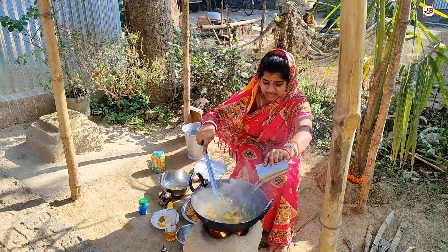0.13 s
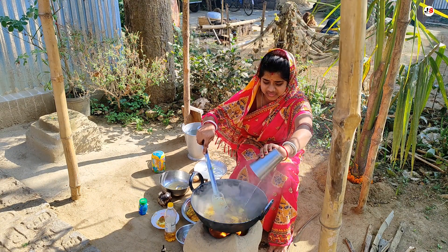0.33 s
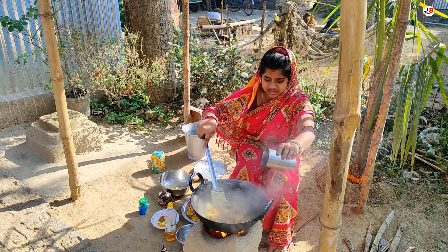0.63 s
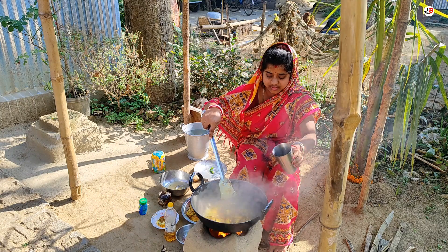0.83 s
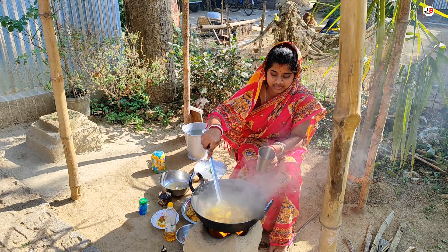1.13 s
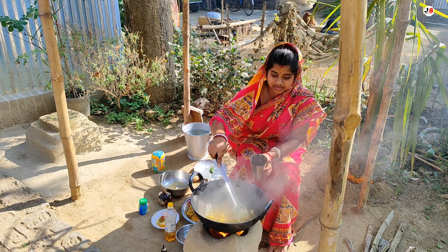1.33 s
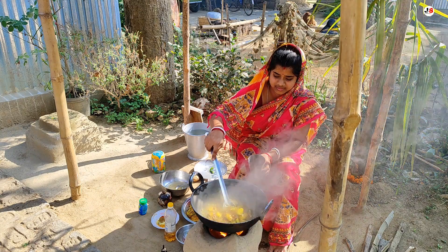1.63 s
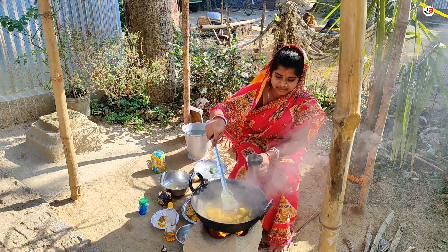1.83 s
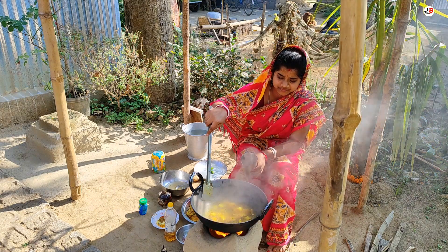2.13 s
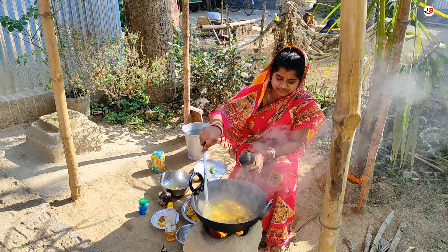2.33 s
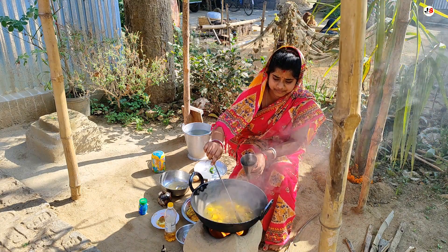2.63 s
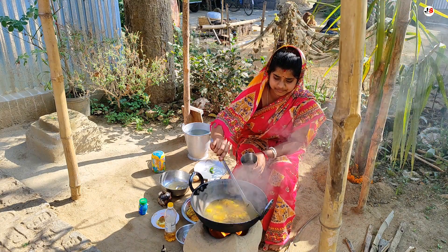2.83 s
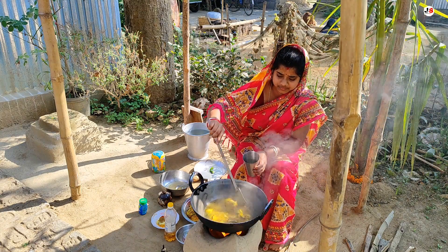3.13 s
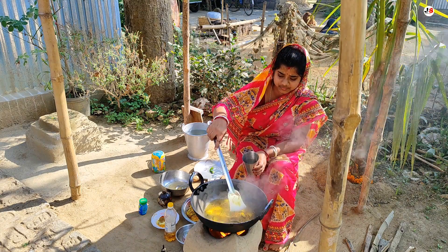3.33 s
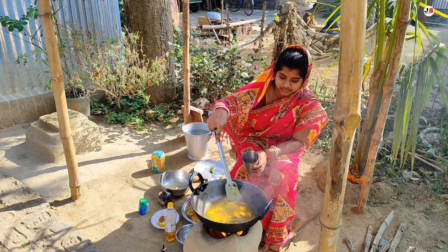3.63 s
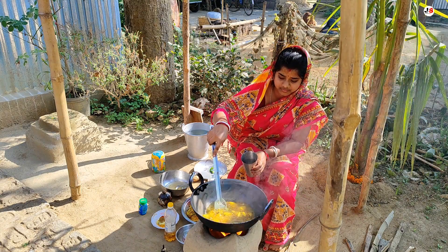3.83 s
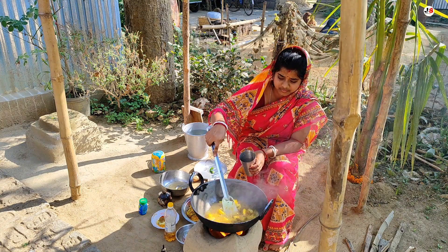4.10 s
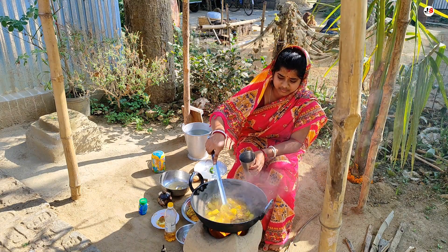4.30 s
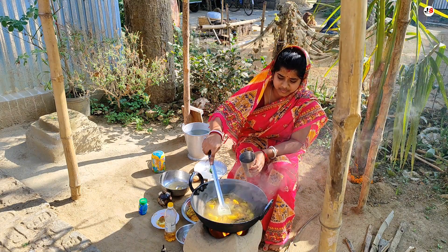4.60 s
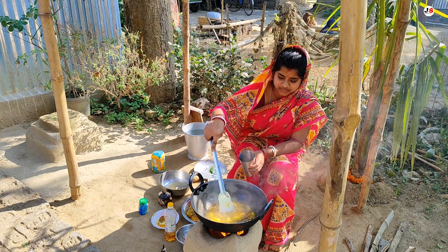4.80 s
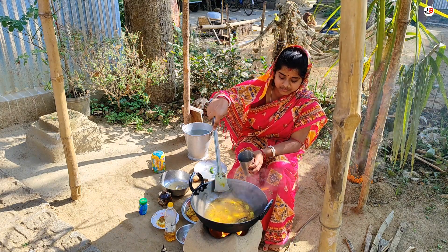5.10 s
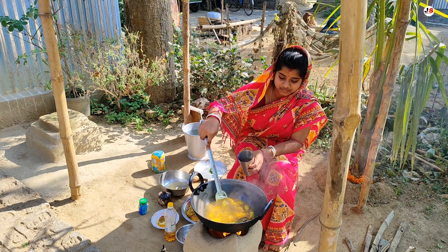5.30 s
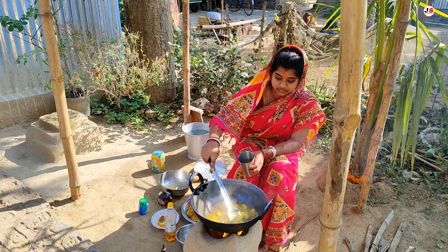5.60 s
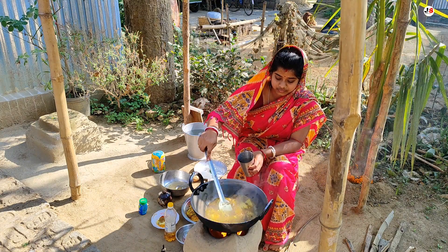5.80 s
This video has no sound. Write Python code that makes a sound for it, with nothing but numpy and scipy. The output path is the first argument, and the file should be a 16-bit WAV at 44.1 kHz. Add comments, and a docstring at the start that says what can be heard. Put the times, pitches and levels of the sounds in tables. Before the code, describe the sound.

The sound opens in full boil: water in a hot iron pan gives a loud, broad, grainy hiss with thick splutter, low gurgle and a hollow pan resonance. It stays strong with small surges until about 1.8 s, then sinks steadily to a thin simmer by 3.6 s. Sizzling flares jump up quickly and fade within fractions of a second near 2.2, 2.6, 3.7, 4.0, 4.2, 4.6, 5.3, 5.6 and 5.85 s, their splutter pitch sagging. Dull, short spatula knocks fall at 1.2 and 2.6 s, with weaker ones at 3.6, 3.8 and 4.0 s. Drops spit sharply at 0.9 and 1.4 s and more often after 4 s, strongest at 4.87 s. Soft low plops come near 5.45 and 5.55 s. A faint distant engine climbs in pitch, swelling around 4.65 s, over low yard and fire rumble. Close, dry outdoor stereo, with wide bright treble.

```python
"""Potatoes frying in a hot iron pan, outdoors

Poured water boils off in a loud hiss that dies down, then flares up each time wet food is turned onto bare iron:
random bursts over steady noise, banded by bubble size. Drops spit (clicks and puffs of noise), the spatula taps
(dying sines), sauce plops (short tones), an engine drones far off (two sines), and the yard and the fire rumble
(low noise). Two microphone ports close to each other colour the treble differently."""
import sys
import numpy as np
from scipy import signal
from scipy.fft import rfft, irfft, next_fast_len
from scipy.io import wavfile
from scipy.ndimage import uniform_filter1d

SR = 44100
rng = np.random.default_rng(int(sys.argv[2]) if len(sys.argv) > 2 else 0)


def int16_out(signal):
    """Quantize to a 16-bit WAV file."""
    q = np.round(np.clip(np.atleast_2d(signal).T, -1, 1) * 32767)
    wavfile.write(sys.argv[1], SR, q.astype(np.int16))


N = 262395

# drops that burst: (time [s], snap level [dB], spray level [dB], spray length [s], drop in boil gain just after [0-1])
SPIT_DROPS = [(0.9395, -33, -23, 0.0011, 0), (1.374, -24, -40, 0.0009, 0.03), (3.477, -40, -52, 0.0011, 0),
              (4.0285, -26, -42, .001, 0), (4.0472, -46, -30, 0.0008, 0.5), (4.0587, -26, -35, 0.00091, 0),
              (4.715, -46, -35, 0.0009, 0), (4.8679, -19.5, -29, 0.0019, 0.9),
              (4.9816, -25, -33, 0.00074, 0), (5.085, -43, -60.5, 0.00094, 0.04),
              (5.2215, -31, -43, 0.0012, 0.05), (5.4625, -46, -39, 0.0012, 0.4),
              (5.48, -41, -50, 0.0012, 0.1), (5.6894, -33, -39, 0.0012, 0.15)]


def amp(db):
    """Decibels to gain."""
    return 10 ** (np.asarray(db) / 20)


def evened(x):
    """Scales to rms 1."""
    return x / np.sqrt(np.mean(x ** 2) + 1e-20)


def summed(*levels_db):
    """Adds levels as powers."""
    return 10 * np.log10(sum(amp(db) ** 2 for db in levels_db))


def read(points, hz):
    """Reads a spectrum table on a log-frequency axis."""
    f, value = np.transpose(points)
    return np.interp(np.log(hz + 1), np.log(f + 1), value)


def colour(x, gain):
    """Filters by a gain given as a function of frequency."""
    size = next_fast_len(N + 4096)
    freqs = np.fft.rfftfreq(size, 1 / SR)
    return irfft(rfft(x, size) * gain(freqs), size)[..., :N]


def band(x, lo, hi):
    """A band with soft shoulders."""
    return colour(x, lambda f: 1 / np.sqrt((1 + (lo / (f + 1)) ** 16) * (1 + (f / hi) ** 16)))


def resonate(x, hz, width_hz):
    """A resonance that follows a moving pitch: shifted down to 0 Hz, smoothed, and shifted back."""
    turn = np.exp(2j * np.pi * np.cumsum(hz) / SR)
    r = np.exp(-np.pi * width_hz / SR)
    return 2 * (turn * signal.lfilter([1 - r], [1, -r], x / turn)).real


def wander(seconds, count=1):
    """Random drift of rms 1 that changes over the given time."""
    size = max(round(seconds * SR), 1)
    noise = rng.standard_normal((count, N))
    return evened(uniform_filter1d(uniform_filter1d(noise, size), size))


def pair(a, b):
    """Two ports close together hear nearly the same bass but unrelated treble."""
    # left-right likeness: (frequency [Hz], likeness [0-1])
    likeness = [(30, .95), (60, .97), (140, .89), (260, .99), (500, .98), (860, .95), (1200, .98),
                (1700, .85), (2800, .82), (3600, .55), (5300, .22), (7500, 0)]
    same = lambda f: np.clip(read(likeness, f), 0, 1)
    near = colour(a, lambda f: np.sqrt((1 + same(f)) / 2))
    apart = colour(b, lambda f: np.sqrt((1 - same(f)) / 2))
    return np.array([near + apart, near - apart])


def bubbles(crowd, spread_db, per_s=12000, hiss=1.0, clump_db=-0.2):
    """Thousands of tiny bursts, a few of them large, over smooth steam; they come in clumps."""
    size = amp(spread_db * np.minimum(rng.exponential(1, N), 4.5))
    size = size * (rng.random(N) < per_s / SR)
    pops = evened(size) * rng.standard_normal((2, N))
    steam = hiss * rng.standard_normal((2, N))
    clumps = amp(clump_db * wander(0.049))
    return pair(*(crowd * clumps * (pops + steam)))


def flare(t, rise, hold, fade_db_per_s):
    """Linear rise from -60 dB, then a hold and a steady fade, in dB below the peak."""
    up = np.clip(t / rise, 1e-3, 1)
    return 20 * np.log10(up) - fade_db_per_s * np.maximum(t - rise - hold, 0)


def heat():
    """The dying boil plus the flares sets the level of each bubble size and the splutter pitch."""
    # poured water boiling away, control levels:
    # (time [s], steam [dB], splutter [dB], gurgle [dB], pan ring [dB])
    boiling_off = [(0, -21, -32, -41, -39), (.2, -22, -33, -40.5, -42), (.55, -25.5, -30.5, -40.5, -38),
                   (0.849, -27.5, -31.5, -40, -39), (1.05, -26.5, -31.5, -39.5, -37.5),
                   (1.22, -25.5, -28.5, -39.5, -35), (1.331, -27.5, -31, -36, -33),
                   (1.5, -25.5, -31.5, -39, -35.5), (1.651, -27.5, -31, -37.5, -37.5),
                   (1.8, -24.5, -32.5, -40.5, -37), (2, -29.5, -36.5, -43.5, -43.5),
                   (2.2, -30, -37, -43, -40.5), (2.549, -34, -37, -43.5, -43), (2.9, -35.5, -41, -46, -45),
                   (3.05, -34.5, -38.5, -47.5, -45), (3.25, -38.5, -45, -48, -47),
                   (3.401, -37.5, -41, -47.5, -48), (3.6, -42, -46.5, -51, -49.5)]
    # how the boil sinks after that: steam, splutter, gurgle, ring [dB/s]
    simmer_db_per_s = [-3, -5.5, -3.5, -5]
    # wet food turned onto bare iron: (start [s], rise [s], hold [s], fade [dB/s], steam [dB], sizzle [dB],
    # lag of the larger bubbles [s], splutter [dB], gurgle [dB], ring [dB], splutter pitch [Hz])
    turned_food = [(2.23, 0.054, 0.038, 90, -33, -44, 0.013, -33.5, -62, -56, 2750),
                   (2.574, 0.07, 0.11, 68, -36, -41.5, .0, -40.5, -69, -43, 2315),
                   (3.668, 0.051, 0.17, 75, -29, -40, 0.021, -39, -55, -48.5, 2180),
                   (3.743, 0.044, .03, 88, -54, -38.5, 0.00059, -35, -57, -45, 2022),
                   (3.995, 0.16, 0.055, 77, -36, -39.5, 0.024, -36.5, -44, -45.5, 2250),
                   (4.225, 0.071, 0.25, 55, -36, -42, 0.099, -39.5, -52, -50.5, 2580),
                   (4.635, 0.051, 0.045, 50, -32, -40.5, 0.012, -39, -53.5, -50, 2200),
                   (5.271, 0.017, 0.032, 131, -33.5, -41, 0.033, -35, -57, -55, 2866),
                   (5.298, 0.025, 0.028, 90, -55, -62, 0.044, -44, -58, -63, 2600),
                   (5.358, .04, 0.021, 35, -42.5, -56, 0.028, -45, -52, -56, 1900),
                   (5.599, 0.12, 0.11, 82.5, -36.5, -41.5, 0.03, -37, -49, -43, 2430),
                   (5.852, 0.033, .08, 56, -36, -42, 0.01, -42, -53, -69, 2590)]
    # own surges of gurgle, splutter, sizzle, fizz, hiss, ring: (depth [dB rms])
    surge_db = [0.25, 0.88, 0.14, 0.9, 0.12, 0.11]
    from_steam = 0.74  # share of the sizzle that follows the steam; the rest follows the splutter
    fizz_from_steam = 0.21  # the rest follows the sizzle
    boil_splutter_hz, sink_hz_per_s, lowest_hz = 2220, 760, 1600
    linger = 0.88  # larger bubbles fade at this share of the steam's speed

    t = np.arange(N) / SR
    s, *columns = np.transpose(boiling_off)
    steam, *large = (np.interp(t, s, c) + sink * np.maximum(t - s[-1], 0)
                     for c, sink in zip(columns, simmer_db_per_s))
    sizzle = -5 + from_steam * steam + (1 - from_steam) * large[0]
    sizzle = summed(sizzle, -61)  # the oil keeps up a thin sizzle between flares
    pitch = amp(large[0]) ** 2 * boil_splutter_hz  # pitches are averaged by splutter power
    for start, rise, hold, fade, steam_db, sizzle_db, lag, *large_db, hz in turned_food:
        early = flare(t - start, rise, hold, fade)
        late = flare(t - start, rise + lag, max(hold - 2 * lag, 0), linger * fade)
        steam = summed(steam, steam_db + early)
        sizzle = summed(sizzle, sizzle_db + from_steam * early + (1 - from_steam) * late)
        large = [summed(old, db + late) for old, db in zip(large, large_db)]
        # the pitch sinks as the bubbles grow
        sunk_hz = np.maximum(hz - sink_hz_per_s * np.maximum(t - start - rise, 0), lowest_hz)
        pitch = pitch + amp(large_db[0] + late) ** 2 * sunk_hz
    splutter, gurgle, ring = large
    fizz = -3.5 + fizz_from_steam * steam + (1 - fizz_from_steam) * sizzle
    levels = [gurgle, splutter - 2.5, sizzle - 4.4, fizz - 2.6, steam - 11, ring]
    surges = np.c_[surge_db] * wander(0.059, count=6)
    return levels + surges, pitch / amp(splutter) ** 2


def mottled(x, patchy_db=1.63, blotchy_db=0.87, streaky_db=3.0, bass_share=0.73, full_hz=2500, trim_db=-0.71):
    """Random gains over time and frequency make the noise uneven: patches, thin streaks, wide blotches."""
    hz, _, z = signal.stft(x, SR, nperseg=1024)
    patches, streaks, blotches = rng.standard_normal((3, *z.shape[1:]))

    def smeared(cells, bins, frames):
        cells = uniform_filter1d(cells, size=bins, axis=0)
        return evened(uniform_filter1d(cells, size=frames, axis=1))

    field_db = patchy_db * smeared(patches, 4, 2)
    field_db = field_db + streaky_db * smeared(streaks, 2, 6)  # thin in frequency, longer in time
    field_db = field_db + blotchy_db * smeared(blotches, 16, 3)  # wide in frequency
    top_db = 4.5  # peaks are held back, holes go deep
    field_db = np.where(field_db > 0, top_db * np.tanh(field_db / top_db), 1.84 * field_db)
    depth = np.clip(hz / full_hz, bass_share, 1)[:, None]  # fainter in the bass
    gain = amp(depth * field_db + trim_db)
    return signal.istft(z * gain, nperseg=1024)[1][:, :N]


def boil():
    """Each bubble size is burst noise in its own band and follows its own heat; the bowl of the pan rings along."""
    # bands of gurgle, splutter, sizzle, fizz, hiss: (low edge [Hz], high edge [Hz])
    size_bands = [(275, 1050), (1400, 3400), (3400, 5000), (5000, 7800), (7800, 16000)]
    # spread of burst sizes in gurgle, splutter, sizzle, fizz, hiss, ring: (spread [dB])
    spiky_db = [0.78, 2.7, 0.84, 0.9, 1.5, 1.8]
    # colour of the pan and the ground around it: (frequency [Hz], gain [dB])
    pan_colour = [(250, -3.5), (400, 3.5), (540, 4), (640, 3), (760, 6), (880, 2), (1020, 2), (1480, -4),
                  (1700, -1.5), (1950, -4.5), (2300, -2.5), (2600, -5), (2950, -2), (3300, -7.5),
                  (3700, -13.5)]
    # moving pitch of the gurgle: (time [s], pitch [Hz])
    gurgle_pitch = [(0, 880), (1.1, 790), (2, 559), (3.2, 524), (4.5, 640), (5.95, 394)]
    ring_hz, ring_width_hz = 1228, 196  # the air in the bowl of the pan

    levels_db, splutter_hz = heat()
    # surges that all sizes share
    crowd = amp(0.33 * wander(0.0015) + 0.54 * wander(0.017) + 0.44 * wander(0.13))
    parts = []
    for (lo, hi), spread_db in zip(size_bands, spiky_db):
        coloured = colour(bubbles(crowd, spread_db), lambda f: amp(read(pan_colour, f)))
        parts.append(band(coloured, lo, hi))
    parts[1] = parts[1] + 1.9 * resonate(parts[1], splutter_hz, 1140)  # most splutter bubbles are near one size
    gurgle_hz = np.interp(np.arange(N) / SR, *np.transpose(gurgle_pitch))
    parts[0] = parts[0] + 0.45 * resonate(parts[0], gurgle_hz, 410)
    bowl = lambda f: 1 / (1 + (2 * (f - ring_hz) / ring_width_hz) ** 2)
    parts.append(colour(bubbles(crowd, spiky_db[-1]), bowl))

    # wide-band pops that follow splutter and sizzle
    crackle = band(bubbles(crowd, 1.2, per_s=1600, hiss=0, clump_db=1.0), 1300, 8100)
    crackle = colour(crackle, lambda f: amp(read([(2500, 6.5), (4200, -5), (6500, -3.5)], f)))
    crackle = evened(crackle) * amp(-8 + summed(levels_db[1] - 13.0, levels_db[2]))
    return crackle + mottled(sum(evened(part) * amp(db) for part, db in zip(parts, levels_db)))


def engine():
    """A distant engine, on the whole speeding up: two wavering low orders of its firing rate."""
    # (time [s], firing rate [Hz], first order [dB], second order [dB])
    drone = [(0, 51.4, -53, -55), (.17, 52.3, -51, -54.5), (.45, 51.4, -64, -59.5), (.84, 53.2, -78, -78),
             (1.232, 54.1, -59, -67), (1.57, 56.5, -60, -61), (2, 55.8, -60, -64), (2.3, 55.6, -56, -60),
             (2.9, 60, -61, -65), (3.301, 59.8, -60, -65), (4.199, 60.4, -63, -59), (4.36, 60, -60, -62.5),
             (4.46, 62.3, -55, -57), (4.65, 61.7, -47, -57), (4.95, 63.4, -53, -55.5),
             (5.08, 63.6, -58, -55), (5.25, 65.2, -63, -58.5), (5.45, 66.9, -66, -63),
             (5.95, 66.4, -64, -73)]
    s, *columns = np.transpose(drone)
    hz, first_db, second_db = (np.interp(np.arange(N) / SR, s, c) for c in columns)
    turn = 2 * np.pi * np.cumsum(hz * (1 + 0.0086 * wander(0.076)[0])) / SR
    waver_db = 0.56 * wander(0.047, count=2)
    first = amp(first_db + waver_db[0]) * np.sin(turn)
    second = amp(second_db + waver_db[1]) * np.sin(2 * turn)
    return np.sqrt(2) * (first + second)


def yard():
    """Low rumble of traffic, fire and air: coloured noise with slight gusts."""
    # spectrum of the rumble: (frequency [Hz], relative level [dB per Hz])
    rumble = [(7.1, -50), (12, -16), (32, -8), (53, 0), (129, -2.5), (170, -10), (297, -16), (350, -11),
              (518, -22), (600, -10), (780, -65), (1320, -120)]
    low = colour(pair(*rng.standard_normal((2, N))), lambda f: amp(read(rumble, f)))
    gusts_db = 1.3 * wander(.07)
    return amp(-61 + gusts_db) * low / band(low, 98, 400).std()  # level set by its 98-400 Hz part


def roar():
    """Low roar of fire and boiling: a warm, lumpy band of noise under the frying."""
    # (time [s], level [dB])
    roar_level = [(0, -63), (.3, -65), (.75, -57.5), (1.2, -68), (1.7, -59.5), (2.05, -58), (2.4, -60.5),
                  (2.7, -64), (3.1, -62), (3.599, -71), (4.1, -67), (4.7, -70), (5.2, -65), (5.95, -64)]
    low = band(pair(*rng.standard_normal((2, N))), 122, 290)
    level_db = np.interp(np.arange(N) / SR, *np.transpose(roar_level))
    lumps_db = 4.5 * wander(0.03)
    return amp(level_db + lumps_db) * evened(low)


def spits():
    """A bursting drop gives a sharp band-limited snap and a short noise spray of fine droplets around it."""
    clicks, spray = np.zeros(N), np.zeros((2, N))
    t = np.arange(-200, 200) / SR
    for s, snap_db, spray_db, length, _ in SPIT_DROPS:
        at = round((s + 0.00037) * SR)  # the snap follows the first droplets
        clicks[at] -= amp(snap_db)
        puff = np.exp(-((t - 0.0004) / length) ** 2)
        spray[:, at - 200:at + 200] += amp(spray_db) * rng.standard_normal((2, 400)) * puff
    clicks = colour(clicks, lambda f: amp(read([(2500, -1), (4200, -6)], f)))
    lo_hz, hi_hz = 1300, 5200
    snaps = band(clicks, lo_hz, hi_hz) * SR / (2 * (hi_hz - lo_hz))  # makes up for the peak lost to the band
    return snaps + band(spray, 7100, 16000)


def dips():
    """Gain of the whole boil, lowered for a few milliseconds around 6 ms after a spit."""
    t = np.arange(N) / SR
    gain = np.ones(N)
    for s, *_, drop in SPIT_DROPS:
        gain = gain * (1 - np.clip(drop, 0, 1) * np.exp(-((t - s - .0058) / .0022) ** 2))
    return gain


def taps():
    """Taps of the spatula: a dull knock of three short modes, for the wet iron barely rings."""
    # (time [s], level [dB])
    knocks = [(1.233, -26), (2.604, -27), (3.632, -33), (3.797, -41), (4.0322, -31)]
    t, out = np.arange(2000) / SR, np.zeros(N)
    modes = [(730, 2, 0.013), (1120, -0.5, 0.027), (1790, -21, 0.0083)]  # (pitch [Hz], level [dB], T60 [s])
    knock = sum(amp(db - 60 * t / t60) * np.sin(2 * np.pi * hz * t) for hz, db, t60 in modes)
    knock = knock * np.minimum(t / 0.00038, 1)
    for s, level_db in knocks:
        out[round(s * SR):][:2000] += amp(level_db) * knock
    return band(out, 290, 6000)


def plops():
    """Big bubbles in the sauce: each a soft, short low tone."""
    # (time [s], level before rise and decay [dB], pitch [Hz])
    sauce_bubbles = [(3.919, -63, 650), (5.444, -36, 521), (5.539, -43, 544), (5.554, -47, 630)]
    t60_s, rise_s = 0.043, 0.0064
    t, out = np.arange(3000) / SR, np.zeros(N)
    for s, level_db, hz in sauce_bubbles:
        envelope = np.minimum(t / rise_s, 1) * amp(level_db - 60 * t / t60_s)
        out[round(s * SR):][:3000] += envelope * np.sin(2 * np.pi * hz * t)
    return out


def scene():
    """All sources as they reach the two ports."""
    return boil() * dips() + engine() + yard() + roar() + spits() + taps() + plops()


def record(dry):
    """Each microphone port resonates in the treble and is flat in the bass; then comes the band limit."""
    # left port: (frequency [Hz], gain [dB])
    left_port = [(3000, 0.5), (3400, -2), (4100, 8), (5200, 0), (5800, 5), (6900, 1.5), (7500, -9.5),
                 (8450, -5.5), (8900, 1), (9500, -0.5), (11200, 6.5), (13300, 3.5), (15700, 10.5)]
    # right port: (frequency [Hz], gain [dB])
    right_port = [(3000, -0.5), (4100, 3.5), (5300, -1), (6900, -1), (7600, -6), (8450, -16.5),
                  (8800, 15.5), (9400, 21.5), (10200, 16.5), (11050, 12), (11900, 19), (12600, 12),
                  (13400, 4), (15700, 8.5)]
    flat = [(2400, 0)]
    ports = np.array([colour(x, lambda f: amp(read(flat + list(port), f)))
                      for x, port in zip(dry, (left_port, right_port))])
    limit = signal.firwin(801, 15750, window=("kaiser", 9), fs=SR)  # low-pass edge in Hz
    return signal.oaconvolve(ports, limit[None], "same")


dry = scene()
out = record(dry)
int16_out(out)
```